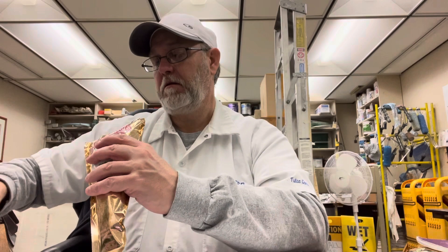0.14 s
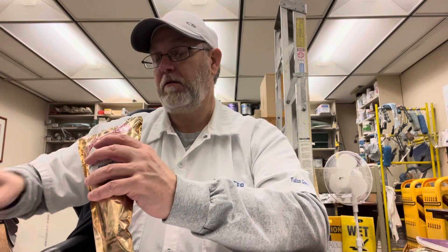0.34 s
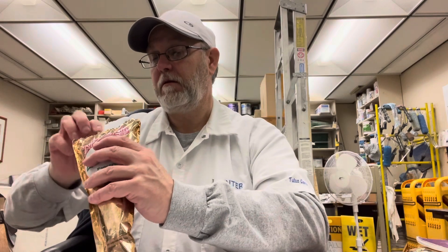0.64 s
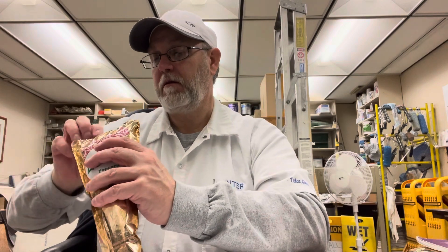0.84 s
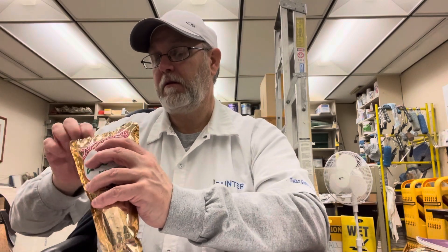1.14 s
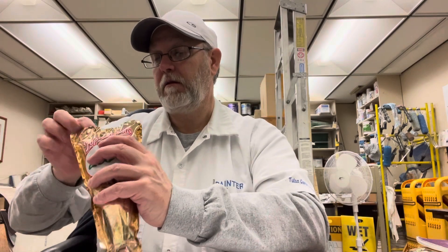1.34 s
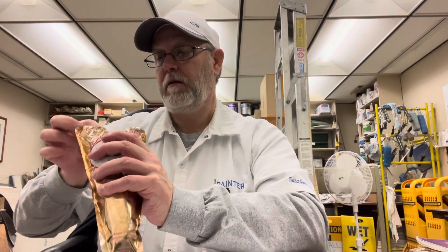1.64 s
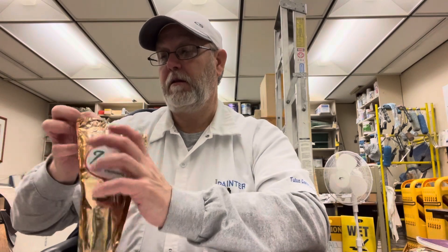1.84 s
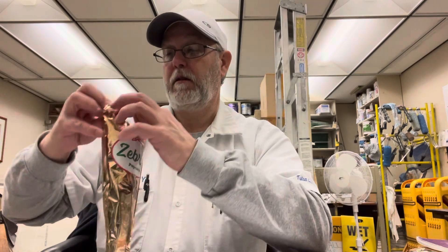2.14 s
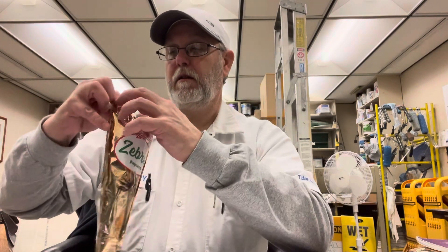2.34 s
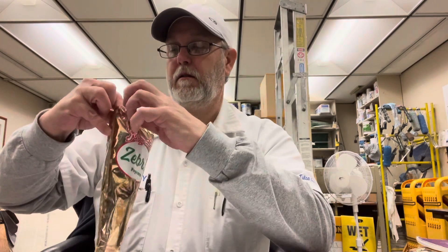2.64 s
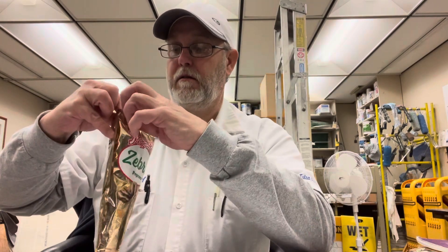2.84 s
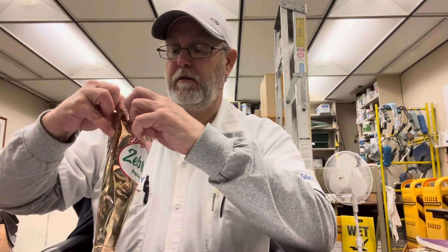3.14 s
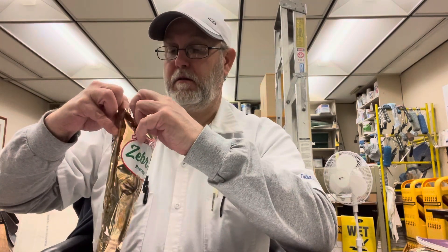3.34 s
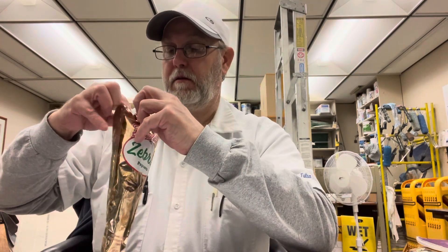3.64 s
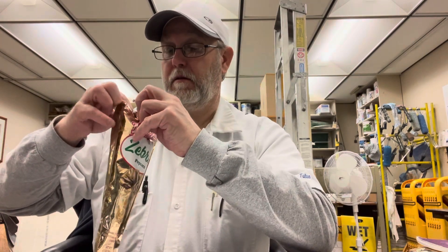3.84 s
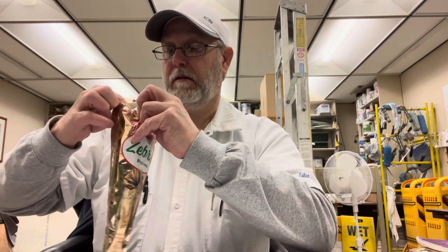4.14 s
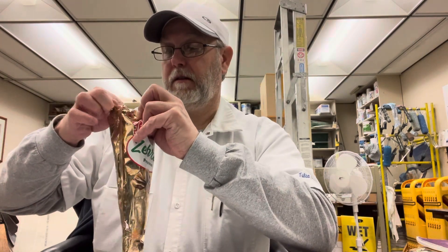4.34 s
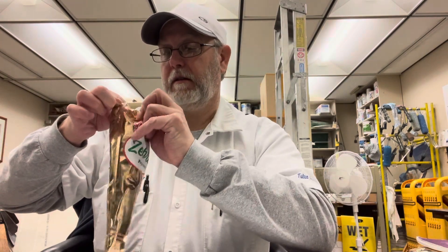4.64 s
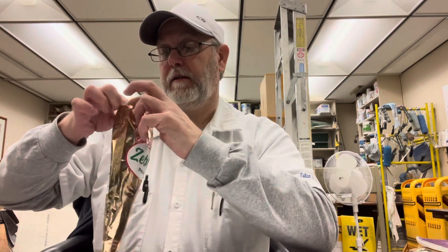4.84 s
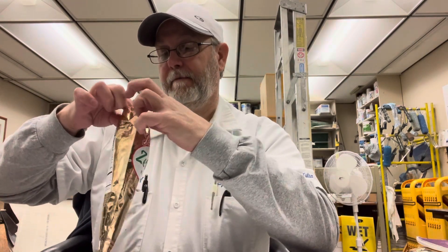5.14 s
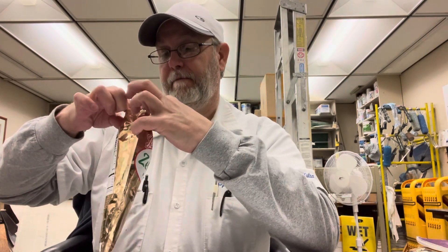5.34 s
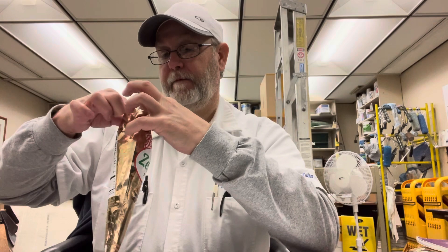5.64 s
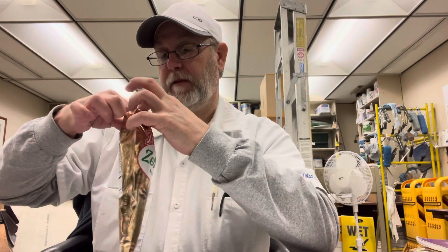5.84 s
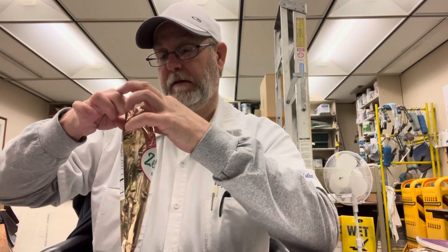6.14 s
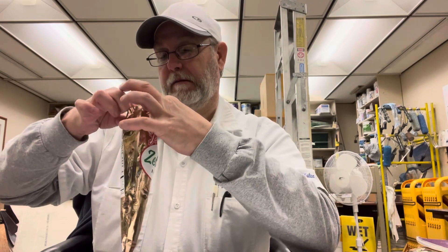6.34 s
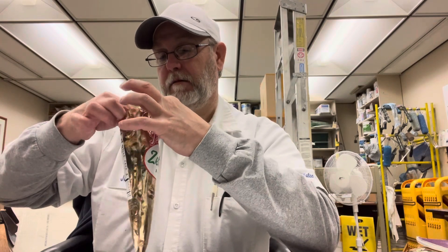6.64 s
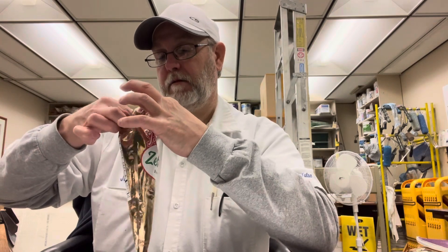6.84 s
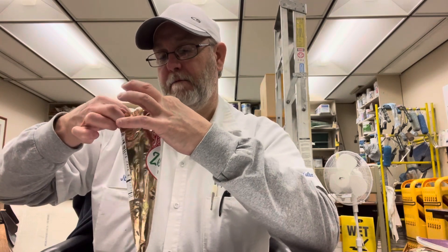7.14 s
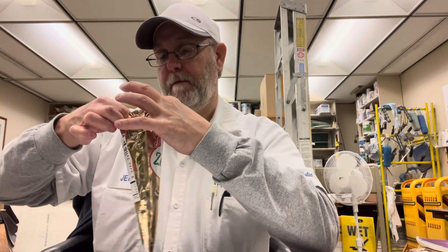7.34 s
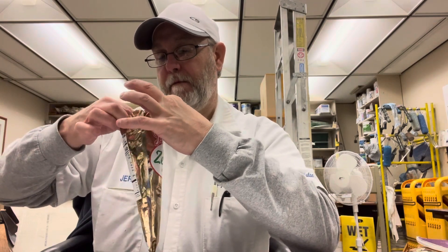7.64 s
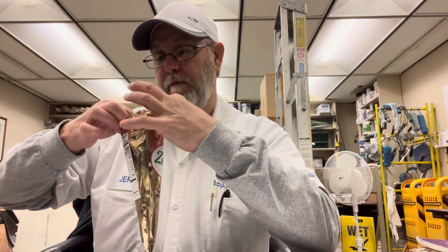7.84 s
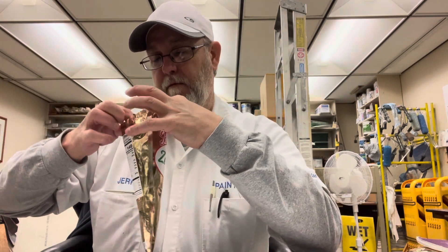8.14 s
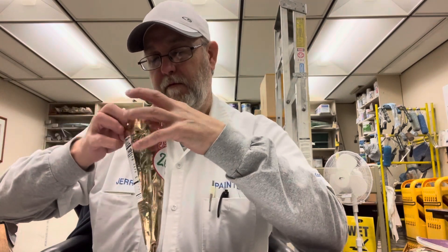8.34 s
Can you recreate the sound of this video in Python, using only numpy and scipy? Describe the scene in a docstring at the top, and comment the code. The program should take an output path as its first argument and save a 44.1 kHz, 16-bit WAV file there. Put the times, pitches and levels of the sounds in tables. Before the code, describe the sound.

A hard object clacks and rocks onto a desk, then close-up foil snack bag crinkling, snapping and popping over low duct rumble.

```python
"""Duct rumble, motor hum and a thin band of hiss open in a small damped room, with a fine rustle of foil.
At once a hard object is set down and rocks on a desk, each contact a clack with ringing damped modes.
Then two hands pinch and pull at a foil snack bag: noise bursts snap crease by crease, with soft dents
and pats, over a rustle of tiny decaying grains and rubbing hiss.
The bag and desk are heard close up, by a two-port microphone on the same desk."""
import sys
import numpy as np
from scipy import signal
from scipy.fft import rfft, irfft, next_fast_len
from scipy.io import wavfile
from scipy.ndimage import uniform_filter1d, map_coordinates

SR = 44100
rng = np.random.default_rng(int(sys.argv[2]) if len(sys.argv) > 2 else 0)


def pcm_store(signal):
    """Save signal as 16-bit PCM."""
    levels = np.round(np.clip(np.atleast_2d(signal), -1, 1) * 32767)
    wavfile.write(sys.argv[1], SR, levels.astype(np.int16).T)


N = 374409

# spectrum of the duct rumble: pitch_hz, relative level_db per Hz
VENT_SPECTRUM = [(25, -29), (55, -8.5), (92, -14), (125, -5.5), (205, -10.5), (280, -24), (400, -22.5),
                 (610, -23.5), (665, -31), (2350, -45.5), (6300, -47.5), (7400, -63.5), (16000, -69)]
# fan motor lines: pitch_hz, typical level_db
MOTOR_LINES = [(59.2, -62.5), (118.6, -53), (318, -74), (525, -76), (624, -76.5)]
# reverberation of the room: pitch_hz, t60_s
ROOM_DECAY = [(100, 0.67), (400, 0.22), (1500, 0.28), (5000, 0.24), (14000, 0.016)]
# how far the left port leads the right for sound from the front: pitch_hz, lead_radians
PORT_LEAD = [(330, 0), (480, .7), (600, 2.3), (750, .6), (900, -.6), (1150, -.3), (1400, .4), (1650, 1.2),
             (2400, -.3), (3300, .6), (4800, .3), (6200, -1.4), (7200, -2.5), (9000, -1.8), (12500, 0),
             (16000, 2)]
# colour of desk and microphone case from the front: pitch_hz, both_ports_db, left_over_right_db
CASE_COLOUR = [(258, -1.5, -1.5), (470, 1.5, 0), (750, -0.5, 5.5), (1050, 0, -0.5), (1424, 2.5, 3),
               (1440, -5.5, -3.5), (1700, 3.5, -1), (1860, -2, 2), (3190, .5, 0), (5400, -3.5, 2.5),
               (9500, -1, -0.5)]
# pinches and pulls of the fingers: start_s (full strength), held_s, effort_db, fizz_over_effort_db
STROKES_OF_FINGERS = [(.02, 0.12, -67.5, 7), (.64, 0.088, -68.5, -4), (.735, .004, -61.5, -18),
                      (.85, 7.7, -69, -2), (.91, 0.11, -50, -8), (1.177, 0.062, -48, -3),
                      (1.31, 0.047, -48.5, -7.5), (1.429, 0.067, -52.5, -6), (1.62, 0.21, -54.5, -5),
                      (1.817, 0.041, -48.5, 3.5), (1.929, 0.0047, -42, 0.5), (2.048, 0.033, -51.5, 0),
                      (2.12, 0.52, -58, -1), (2.28, 0.037, -54.5, 2), (2.571, 0.0063, -48, -12),
                      (2.76, 0.17, -54, 0.5), (2.99, 0.064, -46, -1), (3.232, 0.21, -55.5, -4),
                      (3.42, 0.2, -61, -7), (3.578, 0.065, -47.5, -5.5), (3.729, 0.012, -52.5, 0),
                      (3.904, 0.015, -51.5, -18), (4.045, 0.13, -57, 3), (4.18, 0.05, -54.5, 8.5),
                      (4.279, 0.085, -57.5, 0), (4.4, 0.11, -61, -18), (4.56, 0.38, -59.5, 4.5),
                      (4.67, 0.05, -56, 4.5), (4.969, 0.0076, -45.5, -6), (5.15, 0.019, -52.5, 1.5),
                      (5.568, 0.027, -54.5, -0.5), (5.661, 0.12, -55, -9.5), (5.8, 0.035, -54.5, 7),
                      (5.9, 0.31, -59.5, 3), (6.05, 0.072, -51, -1.5), (6.291, 0.023, -64, 5),
                      (6.425, 0.062, -62, 0.5), (6.56, 0.047, -56, 2.5), (6.789, 0.0082, -51, 1.5),
                      (7.085, 0.033, -55.5, 3.5), (7.282, 0.19, -59, -4), (7.578, 0.043, -53.5, -10),
                      (7.861, 0.061, -49, -9.5), (8.1, 0.035, -54, -7), (8.45, .04, -66.5, -2)]
# spectra of the coarse crumpling and the fine fizz: pitch_hz, relative level_db per Hz
CRUMPLE_SPECTRUM = [(150, -35), (300, 8.5), (470, 7), (760, 1), (1300, 3.5), (1950, 1.5), (2400, 0),
                    (3600, -6.5), (5400, -10.5), (6500, 7), (8000, -28.5), (16000, -36.5)]
FIZZ_SPECTRUM = [(3000, -7), (5500, -6), (7800, -11.5), (11500, -9.5), (14800, -16), (16200, -20.5)]
# the object meeting the desk and rocking to rest: start_s, ring_db, clack_db, desk_knock_db
CONTACTS = [(0.0721, -55, -40, -28), (0.076, -47.5, -38.5, -36.5), (0.1664, -43, -28.5, -45.5),
            (0.1686, -40, -24.5, -41.5), (0.217, -47.5, -48, -50), (0.225, -25.5, -27, -35.5),
            (0.2294, -41, -38, -29), (0.2402, -37, -38, -48), (0.251, -36.5, -37.5, -36.5),
            (0.2667, -35, -43, -30), (0.279, -65, -47, -36.5), (0.2886, -32.5, -39.5, -37.5),
            (0.3, -40, -41.5, -37), (0.3203, -42.5, -53.5, -37.5), (0.334, -60, -70, -43)]
# spectrum of a clack: pitch_hz, relative level_db per Hz
CLACK_SPECTRUM = [(200, -5), (500, 4.5), (1100, 2), (1800, 12), (2800, -6.5), (5000, 1), (8000, -16),
                  (12000, -16.5), (16000, -44)]
# modes of the object (strongest, then higher), desk top and whole desk: pitch_hz, relative level_db, t60_s
OBJECT_MAIN_MODE = [(1308, 0, 0.031)]
OBJECT_OVERTONES = [(1620, -15, 0.041), (1890, 2, 0.045), (2153, 0.5, 0.046), (2350, 3, 0.035),
                    (2890, -7, 0.037), (3570, -7, 0.054)]
DESK_TOP_MODES = [(169, -2, 0.091), (224, 9, 0.023), (331, -4.5, 0.11), (500, 7.5, 0.014), (566, -1, 0.053),
                  (712, -11, 0.083)]
DESK_MODES = [(61.7, -11.5, 0.14), (90.6, 2.5, 0.11), (115, 4, 0.11)]
# creases of the bag buckling: start_s, flap_db (panel), then air_db (pouch), crack_db and tick_db (foil)
# over the flap, pitch_hz of the panel
CREASES = [(0.6, -44, -18, -3, -32, 2310), (0.64, -49, 3, -2.5, -10, 4300),
           (0.8126, -40.5, -9, -1.5, -8.5, 5880), (0.8348, -41.5, -0.5, -6.5, -28, 1440),
           (0.8876, -36.5, -0.5, -6.5, -15, 1280), (0.928, -38, -26, -5, -9, 1630),
           (0.9409, -45.5, -20, 4, 3, 4450), (0.9706, -33, -10, -1.5, -18, 4140),
           (0.9823, -42.5, -1, -1, -4, 4470), (0.991, -37.5, -13, -4, -1.5, 2240),
           (1.0005, -38.5, -0.5, -6, -6, 870), (1.0256, -39.5, -2, -1, 0, 2740),
           (1.0659, -38.5, -5, -0.5, -15, 1330), (1.0782, -38, -4.5, -5, -18, 880),
           (1.131, -41, -3, -1, -5, 5000), (1.204, -34.5, -6, -13, -11, 1670),
           (1.217, -41, 3.5, 4.5, -5, 4800), (1.246, -41.5, 4.5, -6, -10.0, 930),
           (1.3003, -45, -17, 0, -21, 5530), (1.3497, -44.5, -4, 0, 2, 4130),
           (1.43, -38, -5, -5, -15, 2300), (1.436, -44.5, -3, -1, 4.5, 6200),
           (1.504, -43, 0.5, -13, -29, 990.0), (1.521, -39, -14, -8.5, -20, 2470),
           (1.605, -40.5, 3, 6, -1.5, 4100), (1.61, -38, -10, -1, -10, 4520.0),
           (1.6734, -48, -8, 7.5, -12, 5000), (1.7596, -42, 5, -7, -27.0, 1298),
           (1.769, -51.5, -7, 6, 0, 4300), (1.8345, -35.5, -8, -2.5, -10, 2240),
           (1.869, -33, -15, -0.5, -5, 1830), (1.8985, -40, -4.5, -2, 0.5, 6200),
           (1.9509, -41.5, -17.5, 3.5, -1.0, 4270), (2.286, -45, -1.5, -21, -25, 1450),
           (2.3952, -40, -5.5, -15.5, -14.5, 980), (2.49, -55.5, 1, 0, 6, 5555),
           (2.569, -35.5, -4, 7, 2, 4740), (2.607, -44, -17, -9, -18, 1410),
           (2.7056, -32.5, -5.5, 0, -3, 4930), (2.743, -39, -11, -7, -12, 1510),
           (2.7671, -33, -3, -8, -9, 1770), (2.782, -40.5, -10, 0, -3, 5540),
           (2.7914, -34.5, -9, -3.5, -11, 1110), (2.815, -40.5, -14, -2.5, -8, 1700),
           (2.8419, -34.5, -5, 0.5, -1, 3060.0), (2.9608, -40, -14, -4.5, -13, 2150),
           (2.971, -35.5, -5.5, 0, -5, 5450), (2.9839, -32.5, -2, -0.5, 6.5, 5740),
           (3.005, -40.5, -1.5, -2, -11.0, 940), (3.0328, -32.5, -13.5, 5, 0.5, 4800),
           (3.08, -39, -25, -7, -11, 1020), (3.1418, -41.5, -5.5, -3.5, -0.5, 3040),
           (3.159, -39.5, -8, -5, -7.0, 1720.0), (3.174, -36, -17, -3, -19, 1060),
           (3.1874, -42, -8, 12, 1.5, 4470), (3.2338, -45, -8.0, 11.5, 0.5, 5500),
           (3.3557, -45, 5.5, -3, -11, 1164), (3.3943, -37.5, -4.5, -13, -18, 1340),
           (3.412, -38.5, 2, -2, -12, 1330), (3.624, -43.5, -10, -15, -21, 1340),
           (3.8246, -37, -5.5, -3.5, -34, 1240), (3.8974, -34, -11.5, -1.5, -14, 3180),
           (4.0255, -35.5, -6, -6, -13, 1110), (4.0356, -32, 0, -5, -10, 1270),
           (4.1, -45.5, -7, -2, -0.5, 5730), (4.289, -52, 4.5, 4.5, 13.5, 3850),
           (4.361, -52, -15, 16.5, 5.5, 4820), (4.499, -61, 10, 27, 15, 3180),
           (4.537, -33, -6.5, -24, -41.5, 1005), (4.555, -46.5, -15, -2, 0, 4820.0),
           (4.5821, -36.0, 4.5, 0.5, -2.5, 1370), (4.732, -46, -2, -1, -9.5, 4090.0),
           (4.753, -47, -13, 6, 0, 2810), (4.811, -40, -1, 6.5, 1.5, 4930),
           (4.8647, -52.5, 5.5, 7.5, 1, 3190), (4.9605, -30.5, -14, 1.5, -2, 4700),
           (4.968, -37.5, -0.5, 4, 2.5, 2900), (5.1644, -36.5, -9, 6.0, 0, 5190),
           (5.2135, -33, -3, -7.5, -13, 1090), (5.247, -52, -3, 11, 4, 6140),
           (5.2555, -39, 3, -6, -12, 2290), (5.287, -40.5, -8, -12, -25, 1255),
           (5.4187, -31.5, 2, -12, -29, 1350), (5.4501, -38.5, 8.5, -13, -31.0, 1324),
           (5.5114, -45.5, -4.5, 0, -1, 5930), (5.5746, -52, -5, 7.5, -4, 4060),
           (5.706, -46.5, 2.5, -16, -29, 1094), (5.7227, -44, 3.5, -12, -28.5, 1080),
           (5.74, -60.5, 7, 11.5, 9.5, 5180), (5.776, -40, -12.5, -5, -10, 1447),
           (5.8006, -49, 3, 9.5, 7, 3700), (5.897, -37.5, 5, -9.5, -27.0, 1070),
           (5.935, -62, -7, 8, 2, 4850), (6.1945, -45.5, 2.5, 1.5, -8.5, 5000),
           (6.4177, -41, 1, 6, 1.5, 6150), (6.5519, -45.5, 5, 6.5, -3, 5000),
           (6.6005, -44.0, 2.5, 10.5, 5, 5370), (6.668, -33.5, -1.5, 1, -8, 3240),
           (6.8075, -43.5, 8, 3.5, 3, 3970), (7.028, -41.5, 1, -7.5, -18, 1510),
           (7.1132, -45, 4.5, -3, -12, 1116), (7.139, -39.5, -6, -1.5, -12, 2600),
           (7.163, -37.5, -5, -5, -10, 1070), (7.306, -48, -16, -23, -22, 1380),
           (7.5889, -41.5, -7, -5, -19, 1050), (7.601, -43.5, 2, -21, -23.0, 1050),
           (7.618, -48, 3.5, -1.5, -6.5, 4910.0), (7.648, -43.5, -6, -2, -22, 2830),
           (7.724, -50.5, -18, 9.5, -2, 2850), (7.799, -27.5, -7.5, -18, -28, 920),
           (7.869, -45, -14, -6, -21, 1600), (7.912, -46, 5, -7, -10, 1140),
           (7.959, -52.5, -10, -3, -28, 1026), (8.0812, -34, -9, -5.5, -15.5, 1720),
           (8.0982, -40.0, -26, -22, -24.5, 1220), (8.1418, -28.5, -24.5, -15, -16.5, 1820),
           (8.359, -48.5, -9, -18, -34, 1200), (8.4506, -44.5, -13, -12, -19, 1270)]
# parts of a snap (pouch air, panel flap, crease crack, foil tick): lowest_hz, highest_hz, delay_s, t60_s,
# rise_s, weight_db, strain_db around the flip, port_difference (share of noise unlike at the ports)
SNAP_PARTS = [(343, 633, 0.00083, 0.027, 0.0025, -0.5, -16, 0.6),
              (875, 2075, 0.00019, 0.019, 0.00074, -1.06, -24.5, 0.47),
              (2440, 6250, 0, 0.013, 0.00086, 1, -16.5, 1), (6580, 13200, 0, 0.012, 0.0002, 1.5, -51, 0.54)]
# the pouch wall denting softly, without a crease: start_s, level_db
SOFT_DENTS = [(1.191, -38), (1.578, -46), (3.653, -46), (4.79, -44), (5.316, -45), (5.693, -45.5),
              (7.449, -44.5), (7.884, -44.5)]
# fingers landing on the pouch as the grip changes: start_s, level_db
FINGER_PATS = [(1.025, -42.5), (1.19, -48), (1.235, -47), (1.29, -49), (1.605, -46.5)]
# modes of the air-filled pouch: pitch_hz, relative level_db, t60_s
POUCH_MODES = [(193, -1.5, 0.068), (275, -3, 0.051)]

HISS_HZ, HISS_WIDTH_HZ, HISS_DB = 6430, 220, -79.5
GRIP_DB_PER_S, RELAX_DB_PER_S = 549, 184  # every stroke swells quickly and lets go more slowly
LANDING_S = .22  # until then the hand still carries most of the weight
THUD_DB, CARRIED_DB = -1.5, -7.5  # the whole desk's thud over the knock, and its loss while carried
OVERTONES_DB = -3.5  # the object's higher modes, relative to its main note
BOUNCE_S, BOUNCE_DB = 0.000692, -17  # typical delay and strength off the bag's other wall
CLICK_DELAY_S, CLICK_DB = .0002, 18  # when a flip clicks, and how far it stands over the film's noise
DENT_FLAP_DB = -8.5  # the panel's share in a dent
# small stray creases: how many at most, the starting effort that sets off half, level over the effort
STRAY_PER_S, STRAY_EFFORT_DB, STRAY_DB, STRAY_SPREAD_DB = 34, -58, -2, 4.5
TAUT_DB_PER_S = 2  # the bag is drawn ever tauter, so a stray crease takes more and more effort
STRAY_PARTS_DB, STRAY_HZ = [-1.5, 0, -2.5, -10], 2400  # air, flap, crack and tick; typical panel pitch
STRAY_TILT_DB = 4  # strays range from dull knocks to bright ticks
TOP_HZ = 16550  # middle of the recorder's upper cut


def amp(db):
    """Decibels as an amplitude factor."""
    return 10 ** (np.asarray(db) / 20)


def unit(x):
    """A sound scaled to rms 1."""
    return x / np.sqrt(np.mean(x ** 2) + 1e-20)


def along(points, hz):
    """Read a curve of (Hz, value) points on a log frequency axis."""
    f, v = np.transpose(points)
    return np.interp(np.log(hz + 1), np.log(f + 1), v)


def wobble(rate):
    """A smooth random curve, rate knots a second."""
    knots = rng.standard_normal(int(N * rate / SR) + 4)
    return map_coordinates(knots, [np.arange(N) * rate / SR])


def filtered(x, response):
    """Lay a complex response of frequency on a sound."""
    n = x.shape[-1]
    m = next_fast_len(n + 2048)
    return irfft(rfft(x, m) * response(np.fft.rfftfreq(m, 1 / SR)), m)[..., :n]


def coloured(x, spectrum):
    """A sound with a spectrum laid on it, at rms 1."""
    return unit(filtered(x, lambda hz: amp(along(spectrum, hz))))


def add(track, s, sound):
    """Mix a sound into a track at time s, cut off at the track's end."""
    space = track[..., max(0, round(s * SR)):][..., :sound.shape[-1]]
    space += sound[..., :space.shape[-1]]


def close_ports(pair, alike_hz):
    """Diffuse sound reaches both ports alike in the bass, unrelated in the treble."""
    def mid_and_side(hz):
        angle = np.pi / 4 * hz / np.hypot(hz, alike_hz)
        return np.array([np.cos(angle), np.sin(angle)])

    mid, side = filtered(pair, mid_and_side)
    return np.array([mid + side, mid - side])


def ventilation():
    """Air rumbles in the duct as shaped noise; the motor hums in slightly unsteady sine lines."""
    t = np.arange(N) / SR
    air = close_ports(rng.standard_normal((2, N)), alike_hz=410)
    rumble = amp(-52.5) * coloured(air, VENT_SPECTRUM)
    hum = 0
    for hz, db in MOTOR_LINES:
        level = amp(db + 1.6 * wobble(2.6))
        hum = hum + level * np.sin(2 * np.pi * hz * t + 0.2 * wobble(5))
    return (rumble + hum) * amp([[1], [-1]])  # stronger at the left port


def narrow_hiss():
    """A faint steady narrow band of hiss near 6.4 kHz: noise through a steep band filter."""
    narrow = lambda hz: 1 / (1 + (2 * (hz - HISS_HZ) / HISS_WIDTH_HZ) ** 4)
    hiss = close_ports(rng.standard_normal((2, N)), alike_hz=9000)
    return amp(HISS_DB) * unit(filtered(hiss, narrow))


def in_room(x, early_db, early_t60, tail_db):
    """A stereo sound plus the quick scatter from desk and body and the room's own tail."""
    hz, t, z = signal.stft(rng.standard_normal((2, SR // 5)), SR, nperseg=256)
    decay = amp(-60 * t / along(ROOM_DECAY, hz)[:, None])
    tail = signal.istft(z * decay, SR, nperseg=256)[1]
    t = np.arange(tail.shape[1]) / SR
    early = close_ports(rng.standard_normal(tail.shape), alike_hz=5000)
    early = early * np.exp(-np.log(1000) * t / early_t60) * (t > .002)
    tail = close_ports(tail, alike_hz=1156) * np.minimum(t / 0.013, 1)
    answer = amp(early_db) * early / np.linalg.norm(early[0])
    answer = answer + amp(tail_db) * tail / np.linalg.norm(tail[0])
    wet = signal.fftconvolve(x, answer, axes=1)
    add(wet, 0, x)
    return wet


def from_front(pair):
    """Sound bends round the microphone's case and reaches the ports out of step, each with its own colour."""
    case, side = np.array(CASE_COLOUR), np.array([[.5], [-.5]])

    def at_ports(hz):
        colour_db = along(case[:, :2], hz) + side * along(case[:, ::2], hz)
        return amp(colour_db) * np.exp(1j * side * along(PORT_LEAD, hz))

    return filtered(pair, at_ports)


def effort():
    """How hard the fingers work the film and how much it fizzes, in dB: strokes swell, hold and relax."""
    t = np.arange(0, N / SR, .002)
    s, held, db, fizz_db = np.transpose(STROKES_OF_FINGERS)[:, :, None]
    level = db - GRIP_DB_PER_S * np.maximum(s - t, 0) - RELAX_DB_PER_S * np.maximum(t - s - held, 0)
    # the strongest stroke rules at each moment
    return [np.interp(np.arange(N) / SR, t, each.max(axis=0)) for each in (level, level + fizz_db)]


def crackle(low_hz, high_hz, rate, spread_db, cycles, rub_db):
    """Countless tiny creases, each with its own size and pitch, over the hiss of film sliding on film."""
    size = amp(spread_db * np.minimum(rng.standard_normal(N), 1.7))
    pitch = rng.random(N)
    starts = np.flatnonzero(rng.random(N) < rate / SR)
    hz = low_hz * (high_hz / low_hz) ** pitch[starts, None]
    t = np.arange(int(SR * cycles / low_hz)) / SR
    # high creases die sooner and hit harder, so that all pitches carry alike
    decay = np.exp(-np.log(1000) * hz * t / cycles)
    grains = size[starts, None] * hz * np.sin(2 * np.pi * hz * t) * decay
    places = starts[:, None] + np.arange(len(t))
    creases = unit(np.bincount(places.ravel(), grains.ravel(), N)[:N])
    direct = creases + amp(rub_db + 1.1 * wobble(50)) * rng.standard_normal(N)
    return in_room(np.array([direct, direct]), early_db=-11, early_t60=.05, tail_db=-8)[:, :N]


def shifting(pair, patchy_db):
    """The film changes shape under the fingers, so the colour of its noise drifts in patches."""
    z = signal.stft(pair, nperseg=256)[2]
    field = uniform_filter1d(rng.standard_normal(z.shape[1:]), size=6, axis=0)  # across frequency
    field = uniform_filter1d(field, size=10, axis=1)  # across time
    return signal.istft(z * amp(patchy_db * unit(field)), nperseg=256)[1][:, :N]


def rustle(effort_db, fizz_db):
    """The film crumples in soft folds and fizzes in fine ones, as hard as the fingers work it."""
    folds = crackle(low_hz=330, high_hz=6000, rate=560, spread_db=8, cycles=14, rub_db=-7)
    fine = crackle(low_hz=3000, high_hz=15000, rate=2400, spread_db=5.5, cycles=10, rub_db=1)
    folds = coloured(shifting(folds, patchy_db=3), CRUMPLE_SPECTRUM)
    fine = coloured(shifting(fine, patchy_db=1.8), FIZZ_SPECTRUM)
    # the fingers catch and slip, shaking the coarse folds most
    slips_db = 2.94 * wobble(160) + 0.52 * wobble(26)
    return amp(effort_db + slips_db) * folds + amp(fizz_db + 0.24 * slips_db) * fine


def struck(x, span=.006):
    """A decaying sound scaled to rms 1 over its first span seconds."""
    return x / np.sqrt(np.mean(x[..., :int(span * SR)] ** 2) + 1e-20)


def ring(hz, gains, t60, rise, t):
    """Damped modes set off together; gains has one value a mode, or one row per port."""
    modes = np.sin(2 * np.pi * hz[:, None] * t) * np.exp(-np.log(1000) * t / t60[:, None])
    return gains @ modes * (1 - np.exp(-t / rise))


def knock(modes, spread, rise, span, detune=0.021):
    """One blow on a body: where it lands sets the sign, strength and exact pitch of each mode."""
    hz, db, t60 = np.transpose(modes)
    signs = np.sign(rng.standard_normal(len(hz)))
    gains = signs * amp(db + 2 * rng.standard_normal(len(hz)))
    gains = gains * (1 + spread * rng.standard_normal((2, len(hz))))  # unlike at the two ports
    hz = hz * (1 + detune * rng.standard_normal(len(hz)))
    return struck(ring(hz, gains, t60, rise, np.arange(SR // 4) / SR), span)


def flip(t, t60, rise):
    """Envelope of a sudden flip or contact at t = 0: a quick rise, then exponential decay."""
    t = np.maximum(t, 0)
    return (1 - np.exp(-t / rise)) * np.exp(-np.log(1000) * t / t60)


def set_down():
    """Each contact clacks, rings the object's main note and overtones, and shakes the desk under the mic."""
    air, shake, t = np.zeros((2, N)), np.zeros(N), np.arange(SR // 4) / SR
    hz, db, t60 = np.transpose(DESK_MODES)
    thud = struck(ring(hz, amp(db), t60, rise=.012, t=t), span=.025)
    for s, ring_db, clack_db, knock_db in CONTACTS:
        noise = coloured(rng.standard_normal((2, len(t))), CLACK_SPECTRUM)
        clack = struck(noise * flip(t, t60=0.037, rise=0.00069))
        main_note = knock(OBJECT_MAIN_MODE, spread=.1, rise=.002, span=.008)
        overtones = knock(OBJECT_OVERTONES, spread=.5, rise=.001, span=.008)
        desk_top = knock(DESK_TOP_MODES, spread=.3, rise=.0025, span=.012)
        add(air, s, amp(clack_db) * clack)
        add(air, s, amp(ring_db) * main_note)
        add(air, s, amp(ring_db + OVERTONES_DB) * overtones)
        add(air, s, amp(knock_db) * desk_top)
        add(shake, s, amp(knock_db + THUD_DB + CARRIED_DB * (s < LANDING_S)) * thud)
    heard = from_front(in_room(air, early_db=-14, early_t60=.08, tail_db=-23)[:, :N])
    return heard * amp([[.3], [-.3]]) + shake * amp([[2], [-2]])  # stronger at the left port


def panel(hz, pitch_hz, sharpness=10, boost=2.55):
    """Causal response of a patch of film: a broad radiation with one resonance standing out."""
    u = hz / pitch_hz
    return 1 + boost * 1j * u / (sharpness * (1 - u * u) + 1j * u)


def other_wall(hz, delay_s):
    """A snap arrives once directly and once more off the far side of the bag."""
    bounce = amp(BOUNCE_DB)
    return (1 + bounce * np.exp(-2j * np.pi * hz * delay_s)) / np.hypot(1, bounce)


def snap(levels, pitch_hz, lead, strain_time=0.0099, follow_db=-19, follow_gap=0.0045,
         settle_db=-29, settle_time=0.034):
    """Film strains, flips, sets off neighbours and settles with a crinkle; crowded modes burst as noise."""
    t, sound = np.arange(SR // 13) / SR - lead, 0
    follow_s = np.cumsum(rng.exponential(follow_gap, size=3))
    followers = list(zip(follow_s, amp(follow_db + 2 * rng.standard_normal(3))))
    shared, own = rng.standard_normal(len(t)), rng.standard_normal((2, len(t)))
    shared[int((lead + CLICK_DELAY_S) * SR)] += amp(CLICK_DB)  # the fold's own sharp click
    crinkle = unit(np.interp(t, np.linspace(t[0], t[-1], num=60), rng.exponential(size=60) ** 2))
    settle = amp(settle_db) * crinkle * np.exp(-abs(t) / settle_time) * (t > 0)
    bounce_s = BOUNCE_S * (.5 + rng.random())
    # a dent has only the first two parts
    for db, (low_hz, high_hz, delay, t60, rise, trim_db, strain_db, spread) in zip(levels, SNAP_PARTS):
        shape = flip(t - delay, t60, rise)
        strain = amp(strain_db) * np.exp(-abs(t) / strain_time)
        neighbours = sum(size * flip(t - s, t60, rise) for s, size in followers)
        around = shape.max() * (strain + settle) + neighbours
        band = signal.butter(3, [low_hz, min(high_hz, SR / 2.2)], "band", fs=SR, output="sos")
        film = signal.sosfilt(band, shared + spread * own)
        # only the flip itself rings the panel
        rung = filtered(film * shape, lambda hz: panel(hz, pitch_hz) * other_wall(hz, bounce_s))
        burst = rung + film * around
        onset = burst[:, (t > delay) & (t < delay + .006)]
        sound = sound + amp(db + trim_db) * burst / np.sqrt(np.mean(onset ** 2))
    return sound


def stray_creases(effort_db):
    """Small snaps at random, likelier and louder with effort: (start_s, level_db of each part, pitch_hz)."""
    rows = []
    for k, (when, chance, size, bright, pitch) in enumerate(rng.random((300, 5))):
        s = (k + when) / STRAY_PER_S
        if s < N / SR:
            db = effort_db[int(s * SR)]
            needed_db = STRAY_EFFORT_DB + TAUT_DB_PER_S * s
            if chance < 1 / (1 + amp(needed_db - db) ** 2):
                tilt_db = STRAY_TILT_DB * (2 * bright - 1) * np.linspace(-1, 1, num=4)
                levels = db + STRAY_DB + STRAY_SPREAD_DB * (2 * size - 1) + tilt_db + STRAY_PARTS_DB
                rows.append((s, levels, STRAY_HZ * 2 ** (2 * pitch - 1)))  # within an octave either way
    return rows


def snaps(effort_db):
    """Buckling film in loud creases, soft dents and small strays, answered by the room."""
    track = np.zeros((2, N))
    lead = .016  # seconds of straining before the flip
    creases = [(s, db + np.array([air_db, 0, crack_db, tick_db]), hz)
               for s, db, air_db, crack_db, tick_db, hz in CREASES]
    dents = [(s, [db, db + DENT_FLAP_DB], STRAY_HZ) for s, db in SOFT_DENTS]
    for s, levels, pitch_hz in creases + dents + stray_creases(effort_db):
        dry_snap = snap(levels, pitch_hz, lead)
        add(track, s - lead, in_room(dry_snap, early_db=-15.0, early_t60=0.039, tail_db=-19.0))
    return track


def pats():
    """Fingers land on the air-filled pouch, whose modes answer with a short hollow thump."""
    track = np.zeros((2, N))
    for s, db in FINGER_PATS:
        add(track, s, amp(db) * knock(POUCH_MODES, spread=.1, rise=.003, span=.02))
    return track


def scene():
    """The steady background, the object on the desk, and the bag in front of the microphone."""
    background = ventilation() + narrow_hiss()
    effort_db, fizz_db = effort()
    bag = rustle(effort_db, fizz_db)
    desk = set_down()
    bag = bag + snaps(effort_db) + pats()
    return background + desk + from_front(bag)


def record(dry):
    """The recorder keeps nothing above its band limit, reached by a 600 Hz wide slope."""
    return filtered(dry, lambda hz: np.clip((TOP_HZ - hz) / 600 + .5, 0, 1))


dry = scene()
out = record(dry)
pcm_store(out)
```